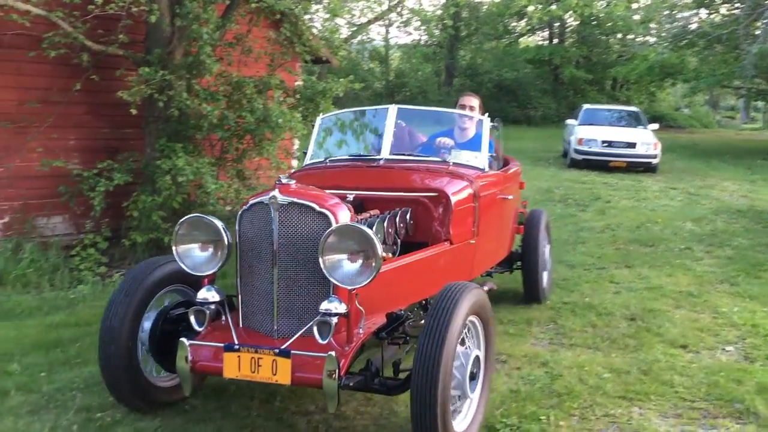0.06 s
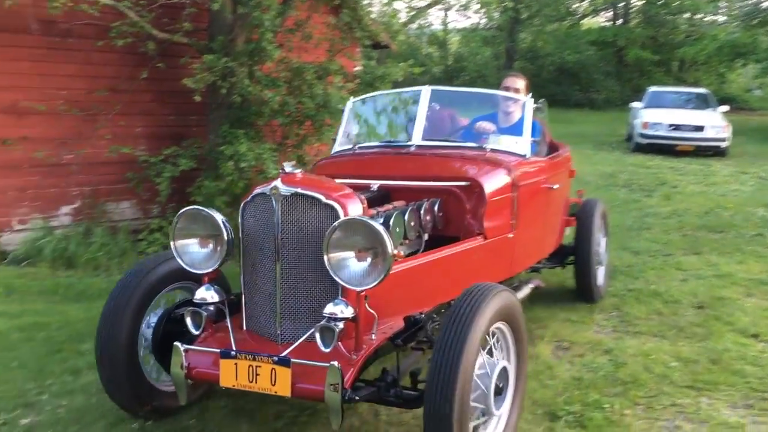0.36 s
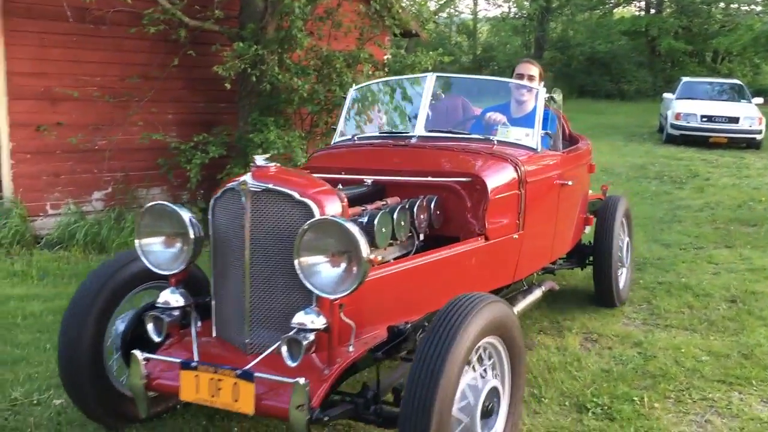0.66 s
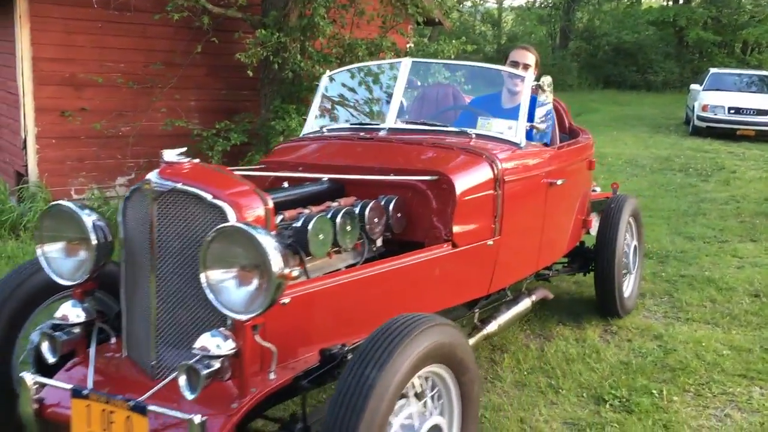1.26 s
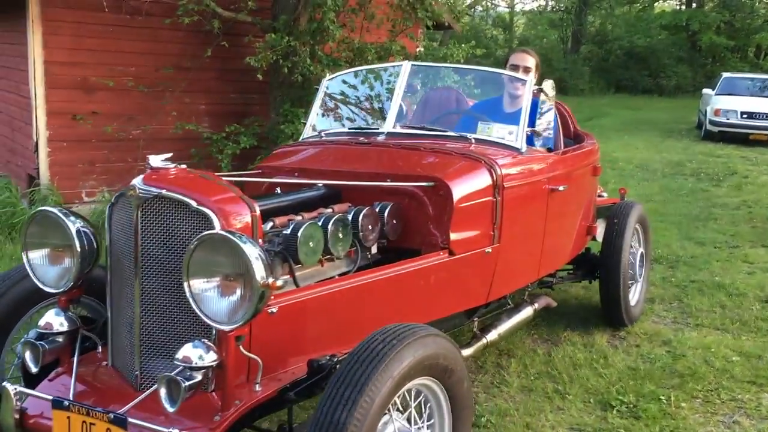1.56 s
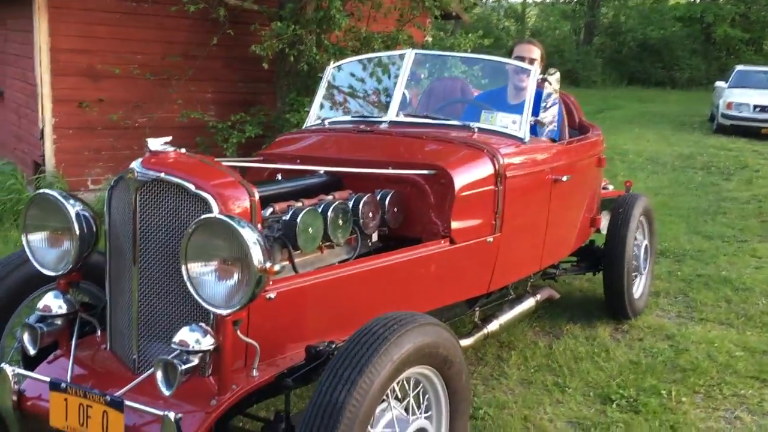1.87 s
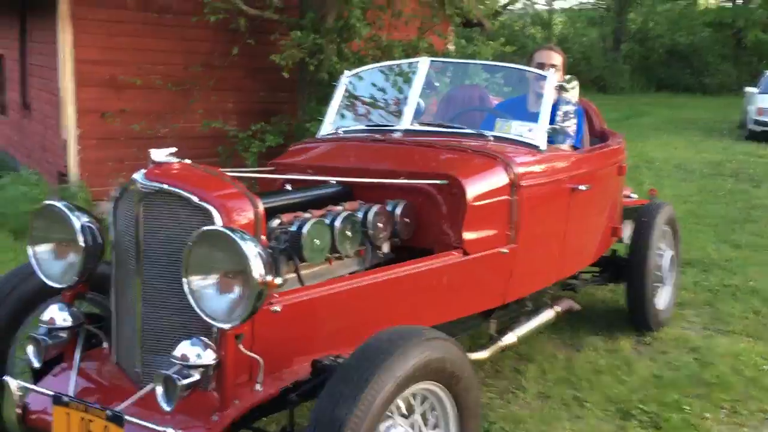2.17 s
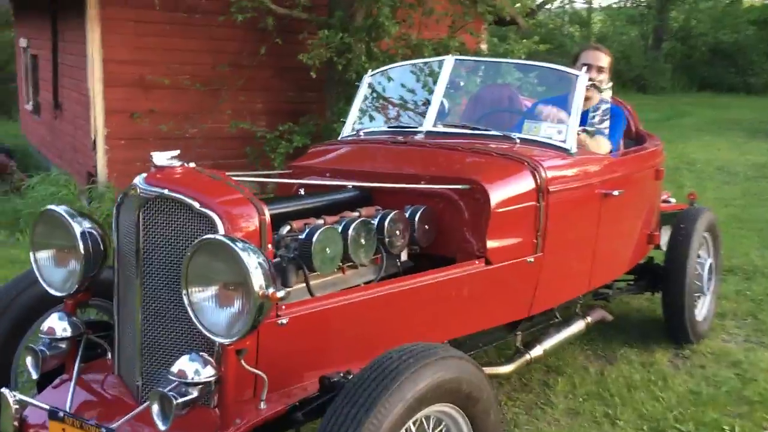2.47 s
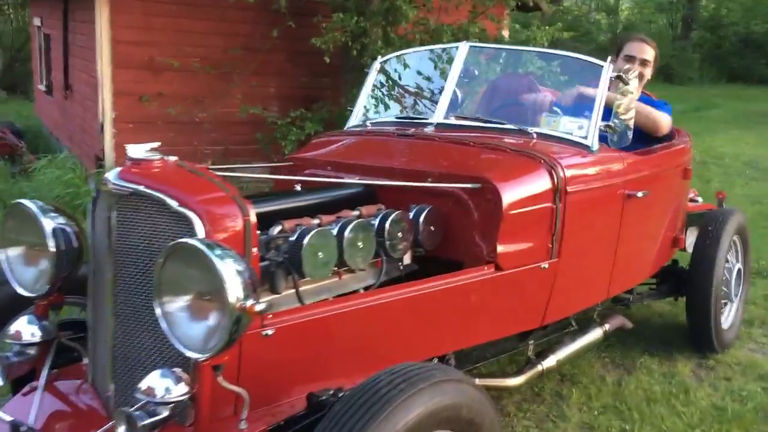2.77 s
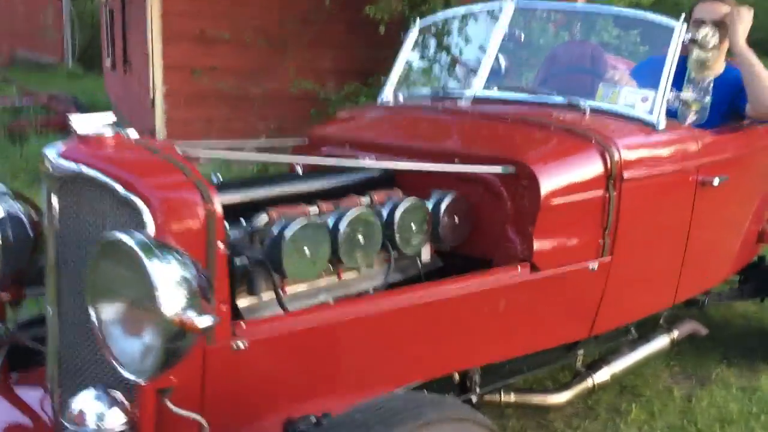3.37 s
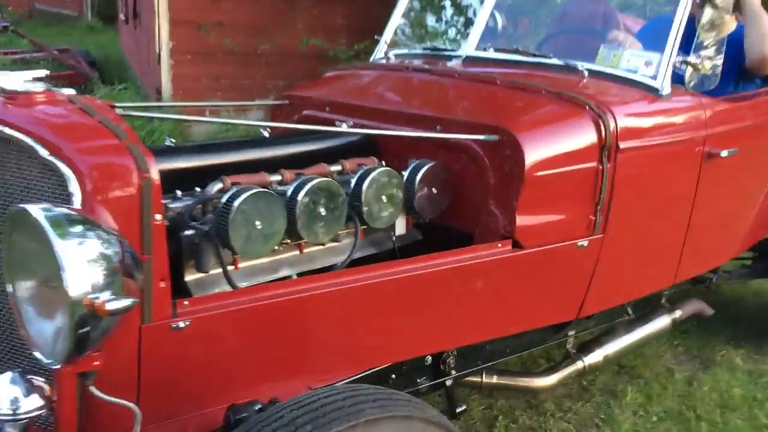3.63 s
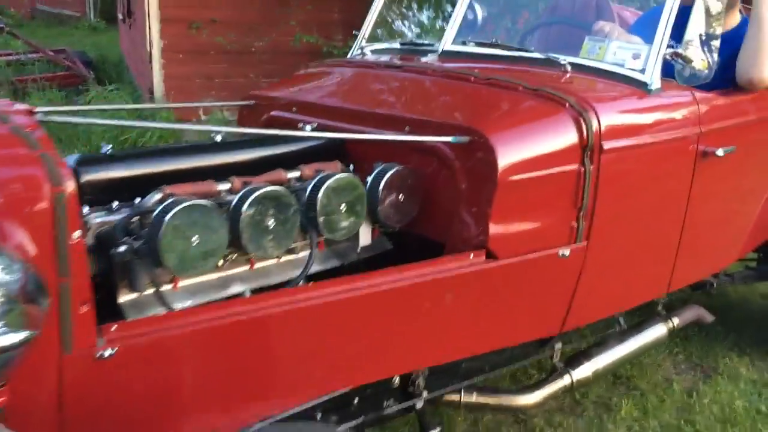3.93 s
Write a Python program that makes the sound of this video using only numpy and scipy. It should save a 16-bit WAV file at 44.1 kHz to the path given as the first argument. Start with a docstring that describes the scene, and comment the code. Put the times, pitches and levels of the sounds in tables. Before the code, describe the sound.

Deep, uneven idle of an old open car's engine, with faint ticks and belt chirps.

```python
"""A lumpy, booming idle that stumbles now and then: an old open car's eight-cylinder engine, on grass.
Exhaust beats follow the crankshaft and uneven firings ring the pipe. The block clatters, a belt
pulley chafes once a turn, the valve gear ticks and the carburettors hiss. The listener walks up
to the open bay, so the clatter changes colour and the hiss and ticks grow louder."""
import sys
import numpy as np
from scipy import signal
from scipy.fft import rfft, irfft
from scipy.io import wavfile
from scipy.ndimage import uniform_filter1d

SR = 44100
rng = np.random.default_rng(int(sys.argv[2]) if len(sys.argv) > 2 else 0)


def waveform_to_disk(signal):
    """Save audio, clipped to [-1, 1], as 16-bit WAV at the path in sys.argv[1]."""
    frames = np.transpose(np.atleast_2d(signal))
    scaled = np.clip(frames, -1, 1) * 32767
    samples = np.round(scaled).astype(np.int16)
    wavfile.write(sys.argv[1], SR, samples)


N = 176400

# crankshaft speed: time_s, speed_rpm
CRANK_SPEED = [(0.0, 1401.0), (0.04, 1525.0), (0.25, 1591.0), (0.3, 1514.0), (0.55, 1606.0), (0.62, 1410.0),
               (1.03, 1595.0), (1.11, 1502.0), (1.62, 1495.0), (1.76, 1418.0), (1.95, 1497.0),
               (2.36, 1398.0), (2.41, 1427.0), (2.88, 1440.0), (3.02, 1408.0), (3.17, 1553.0),
               (3.34, 1390.0), (3.53, 1544.0), (3.69, 1452.0), (4.0, 1401.0)]
# listener's approach: time_s, exhaust_gain_db, block_gain_db, hiss_and_tick_gain_db
APPROACH = [(0, -1.5, -2, -3.5), (.7, -1.14, -2.5, -3), (1.3, -0.5, 0.5, -1.5), (2.3, -0.2, 1, -0.9),
            (2.9, 0.35, 2, 1.1), (3.3, 0, 1, 0.9), (3.4, 2, 2, 4), (3.6, 0.5, 3, 2), (4, 3, 3, 5)]
# carburettor hiss: freq_hz, relative_db
HISS_SPECTRUM = [(1500, -1.5), (3000, 3), (3700, -6.5), (4700, -4), (5200, -1.5), (5700, -2), (6500, -1.5),
                 (7500, -2.5), (8900, -2), (9900, 1), (10500, -2), (11600, 0.5), (14400, 1.5), (17000, 1)]
# intake resonances: centre_hz, width_hz, relative_db
INTAKE_WHISTLES = [(2934, 210, 1), (3270, 170, -.5), (6610, 240, -5), (8740, 380, -5.5), (9720, 300, -6),
                   (11850, 560, -6), (14600, 400, -8)]
# valve ticks: phase_cycles, relative_db
VALVE_TIMING = [(.01, 0), (.07, -1), (.45, -2), (.53, 2), (.77, -4), (.85, -4)]
# harder valve clicks: start_s, strength_db
VALVE_CLICKS = [(1.467, -40), (1.51, -41), (1.957, -38), (2.459, -42), (2.64, -41), (3.124, -39),
                (3.37, -38), (3.451, -38.5), (3.772, -37), (3.974, -38)]
# valve gear ring: freq_hz, relative_db
VALVE_SPECTRUM = [(1000, 11.5), (4200, -1.5), (6650, 6), (7500, 0.5), (8700, 9.5), (10500, 0), (11700, 9.5),
                  (13500, 1), (17000, 4)]
# ordinary belt chafing: time_s, peak_db, pitch_hz
BELT_CHAFE = [(0, -46, 990), (.55, -44, 980), (.68, -57, 975), (.85, -41, 965), (1.4, -40.5, 950),
              (2.6, -45, 920), (4, -42, 915)]
# loud belt chirps, each on the nearest pulley turn: time_s, peak_db
BELT_CHIRPS = [(.505, -39), (.59, -38.5), (.775, -39), (.82, -38.5), (1.03, -37), (1.075, -34),
               (1.165, -36), (1.255, -36), (1.3, -36.5), (1.435, -36), (1.52, -34), (1.61, -34.5),
               (1.89, -37), (1.98, -37), (2.21, -37), (2.49, -36), (3.635, -36)]
# block and timing gear clatter: freq_hz, front_relative_db, side_relative_db
CLATTER_SPECTRA = [(20, 17.5, 11.5), (118, -9.5, 18), (310, 2, -8), (385, 9.5, -27), (413, -3.5, -7),
                   (554, 3.5, 5), (699, 3.5, 12), (776, -2, 1.5), (863, 7, 11), (1345, -0.5, 1.5),
                   (1720, -4, -6.5), (2080, -9.5, -11), (2450, -11.5, -6), (2970, -4.5, -6),
                   (3290, -6.5, -17), (3580, -17, -40), (17000, -47, -50)]
# light taps in the block: freq_hz, relative_db
TAP_SPECTRUM = [(500, 4), (1100, 5.5), (1700, 5.5), (2900, -4.5), (3400, -5), (4500, -8.5), (17000, -26)]
# exhaust harmonics: multiple_of_cycle_rate, relative_db
EXHAUST_ORDERS = [(4, -6.3), (7, -14), (8, 1.4), (12, -13.5), (14, -10.3), (15, -19), (17, -22)]
# runs of weak firings: centre_s, length_s, depth_db
WEAK_FIRINGS = [(0.179, 0.046, -14.0), (0.281, 0.051, -16.0), (0.578, 0.051, -15.0), (1.048, 0.049, -8.0),
                (1.173, 0.043, -8.0), (1.349, 0.053, -11.0), (1.596, 0.044, -8.0), (1.657, 0.046, -10.0),
                (1.742, 0.045, -7.0), (2.037, 0.058, -12.0), (2.264, 0.05, -11.0), (2.524, 0.044, -8.0),
                (2.723, 0.052, -9.0), (2.913, 0.046, -10.0), (3.215, 0.058, -13.0), (3.324, 0.051, -9.0),
                (3.571, 0.051, -10.0), (3.646, 0.05, -11.0), (3.866, 0.079, -17.0)]
# exhaust pipe resonances: centre_hz, width_hz, relative_db
PIPE_MODES = [(38, 12, -11), (60, 24, -2), (86, 30, 0), (152, 24, -7), (178, 22, -4), (204, 16, -11.5),
              (281, 14, -15.5)]


def undb(db):
    return 10 ** (np.asarray(db) / 20)


def unit_rms(x):
    return x / np.sqrt(np.mean(x ** 2))


def curve(rows):
    """Linear tracks through (time_s, value, ...) rows, one per value column."""
    times_s, *columns = np.array(rows, float).T
    return [np.interp(np.arange(N) / SR, times_s, column) for column in columns]


def noise(spectrum):
    """Unit-rms noise shaped by (freq_hz, relative_db) rows."""
    hz, db = np.array(spectrum, float).T
    bins_hz = np.maximum(np.fft.rfftfreq(N, 1 / SR), 1)
    gain = undb(np.interp(np.log(bins_hz), np.log(hz), db))
    return unit_rms(irfft(rfft(rng.standard_normal(N)) * gain, N))


def resonate(x, hz, width_hz):
    """Steep resonance: one band-pass, twice."""
    b, a = signal.iirpeak(hz, hz / width_hz, fs=SR)
    return signal.lfilter(b, a, signal.lfilter(b, a, x))


def flutter(hz):
    """Unit-rms random wavering, up to the given rate."""
    lowpass = signal.butter(2, hz, fs=SR, output="sos")
    return unit_rms(signal.sosfilt(lowpass, rng.standard_normal(N)))


def strikes(clock, marks, sizes):
    """An impulse wherever the rising clock passes a mark."""
    inside = (marks > clock[0]) & (marks < clock[-1])
    return np.bincount(np.searchsorted(clock, marks[inside]), sizes[inside], N)


def decay(hits, decay_s):
    """An exponential tail on each impulse."""
    return signal.lfilter([1], [1, -np.exp(-1 / (decay_s * SR))], hits)


def carburettors(hiss_db=-42.5, whistle_db=-56, flicker_db=3, pulse_db=0):
    """Intake air hisses; narrow resonances whistle, each flickering on its own."""
    whistles = 0
    for hz, width_hz, db in INTAKE_WHISTLES:
        band = resonate(rng.standard_normal(N), hz, width_hz)
        whistles += undb(whistle_db + db) * unit_rms(band * undb(flicker_db * flutter(hz=5.7)))
    intake = noise(HISS_SPECTRUM) * undb(hiss_db) + whistles
    return intake * undb(pulse_db * flutter(hz=59.7))  # no pulsing at 0 dB


def valve_gear(t, cycles, near_db, tick_db=-45.3, scatter_db=7, rise_s=0.005, decay_s=0.017):
    """Each valve ticks once a cycle, never twice alike; now and then one clicks harder."""
    phase_cycles, valve_db = np.array(VALVE_TIMING).T
    tick_cycles = np.arange(-1, 54)[:, None] + phase_cycles
    force = undb(valve_db + scatter_db * rng.uniform(-1, 1, tick_cycles.shape))
    ticks = unit_rms(decay(strikes(cycles, tick_cycles.ravel(), force.ravel()), decay_s))
    click_s, click_db = np.array(VALVE_CLICKS).T
    clicks = decay(strikes(t, click_s, undb(click_db)), decay_s)
    envelope = uniform_filter1d(ticks * undb(tick_db + near_db) + clicks, int(rise_s * SR))
    return noise(VALVE_SPECTRUM) * envelope


def belt_pulley(t, cycles, width_turns=0.27, drop_hz_per_turn=110, waver_hz=14, scatter_db=1.5):
    """The belt chafes once a pulley turn: a short falling chirp, much louder on some turns."""
    turns_per_cycle, chafe_at_turns = 1.798, 0.685
    turns = turns_per_cycle * cycles - chafe_at_turns
    turn_index = np.round(turns)
    offset_turns = turns - turn_index
    peak_db, centre_hz = curve(BELT_CHAFE)
    peak_db += scatter_db * flutter(hz=6)
    for time_s, chirp_db in BELT_CHIRPS:
        peak_db[turn_index == np.round(np.interp(time_s, t, turns))] = chirp_db
    pitch_hz = centre_hz - drop_hz_per_turn * offset_turns + waver_hz * flutter(hz=58.7)
    envelope = undb(peak_db) * np.exp(-(offset_turns / width_turns) ** 2)
    return envelope * np.sin(2 * np.pi * np.cumsum(pitch_hz) / SR)


def engine_block(t, clatter_db=-39, rough_db=1, tap_db=-55, tap_range_db=10, walk_s=(0.66, 2.22)):
    """Dense clatter that changes colour on the walk from front to side, plus light random taps."""
    hz, front_db, side_db = np.array(CLATTER_SPECTRA).T
    side_share = np.interp(t, walk_s, [0, 1])
    front = np.sqrt(1 - side_share) * noise(np.c_[hz, front_db])
    side = np.sqrt(side_share) * noise(np.c_[hz, side_db])
    clatter = unit_rms((front + side) * undb(rough_db * flutter(hz=258)))
    when, force = rng.uniform(size=(420, 2)).T
    hits = strikes(t, when * t[-1], undb(tap_range_db * force))
    taps = unit_rms(decay(hits, decay_s=0.001) * noise(TAP_SPECTRUM))
    return clatter * undb(clatter_db) + taps * undb(tap_db)


def pipe_burble(cycles, firings=440, jitter_cycles=0.01):
    """Unequal firings, eight a cycle, ring the exhaust pipe."""
    force, lateness = rng.uniform(-1, 1, size=(firings, 2)).T
    puffs = strikes(cycles, np.arange(firings) / 8 + jitter_cycles * lateness, force)
    return unit_rms(sum(undb(db) * resonate(puffs, hz, width_hz) for hz, width_hz, db in PIPE_MODES))


def exhaust(t, cycles, rpm, note_db=-13.3, burble_db=-24, smear_rad=0.09, waver_rad=0.6):
    """Note and burble sag at each stumble; at lower speed the firing note booms, upper orders soften."""
    boom_db_per_rpm, bark_db_per_rpm = 0.0091, 0.02
    sag_db = sum(depth_db * np.exp(-(2 * (t - centre_s) / length_s) ** 2)
                 for centre_s, length_s, depth_db in WEAK_FIRINGS)
    excess_rpm = rpm - rpm.mean()
    note = 0
    for order, db in EXHAUST_ORDERS:
        lag_rad = smear_rad * (order - 4) * (order - 8)
        if order < 7:
            swell_db = 0.7 * sag_db
        elif order <= 8:  # at or just under the firing rate
            swell_db = sag_db - boom_db_per_rpm * excess_rpm
        else:
            swell_db = 0.47 * sag_db + bark_db_per_rpm * excess_rpm
            lag_rad += waver_rad * flutter(hz=7)
        note += undb(note_db + db + swell_db) * np.cos(2 * np.pi * order * cycles - lag_rad)
    return note + pipe_burble(cycles) * undb(burble_db + 0.3 * sag_db)


def scene(first_beat_cycles=0.604):
    """The crankshaft times belt, valves and exhaust; the approach lifts block, hiss, ticks and exhaust."""
    t = np.arange(N) / SR
    rpm = curve(CRANK_SPEED)[0]
    cycles = np.cumsum(rpm) / (2 * 60 * SR) - first_beat_cycles  # two crank turns a cycle
    exhaust_db, block_db, treble_db = curve(APPROACH)
    mix = engine_block(t) * undb(block_db)
    mix += belt_pulley(t, cycles)
    mix += carburettors() * undb(treble_db)
    mix += valve_gear(t, cycles, treble_db)
    mix += exhaust(t, cycles, rpm) * undb(exhaust_db)
    return mix[None]


def record(dry, low_cut_hz=26, high_cut_hz=17000):
    """Thins the deepest bass, rounds the loudest beats, cuts the top."""
    bins_hz = np.fft.rfftfreq(N, 1 / SR)
    highpass_gain = 1 - 1 / (1 + (bins_hz / low_cut_hz) ** 6)
    thinned = irfft(rfft(dry) * highpass_gain, N)
    rounded = thinned / (1 + thinned ** 6) ** (1 / 6)
    lowpass = signal.ellip(10, 0.1, 80, high_cut_hz, fs=SR, output="sos")
    return signal.sosfilt(lowpass, rounded)


dry = scene()
out = record(dry)
waveform_to_disk(out)
```